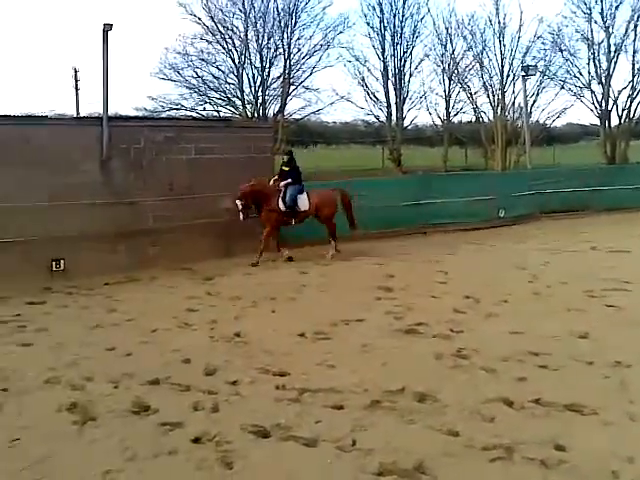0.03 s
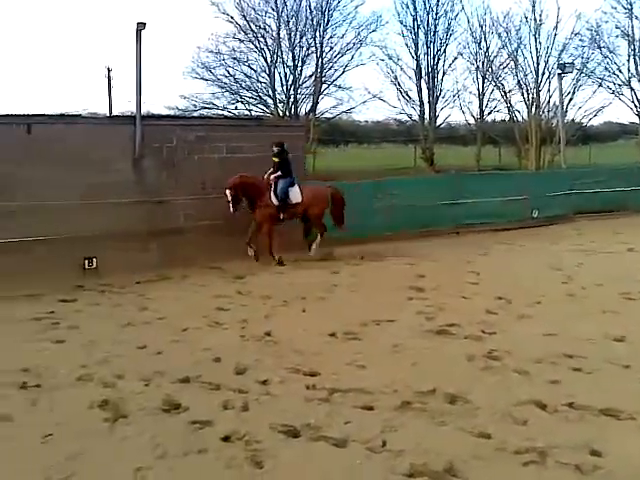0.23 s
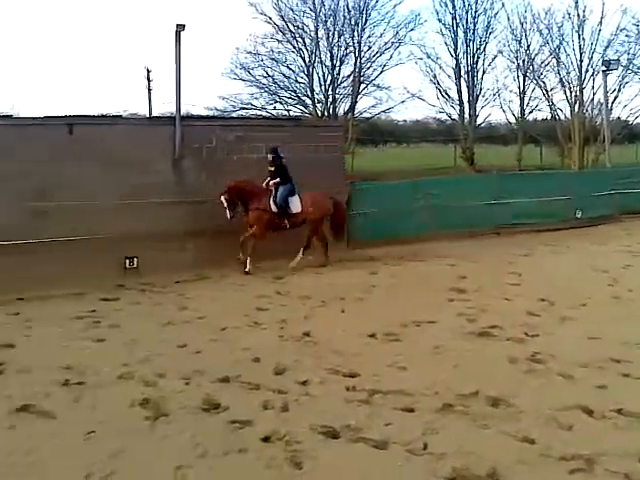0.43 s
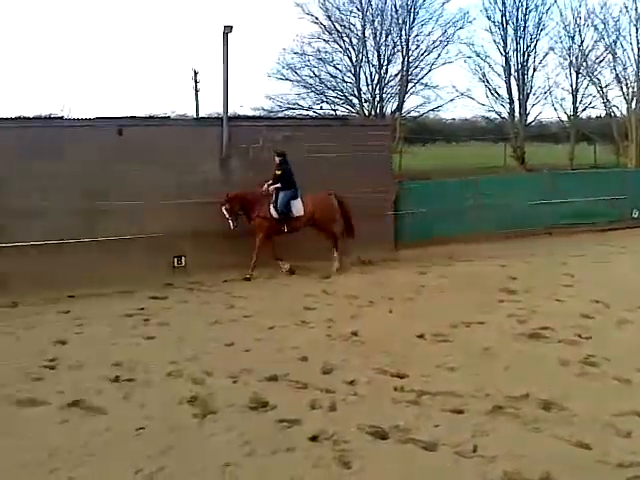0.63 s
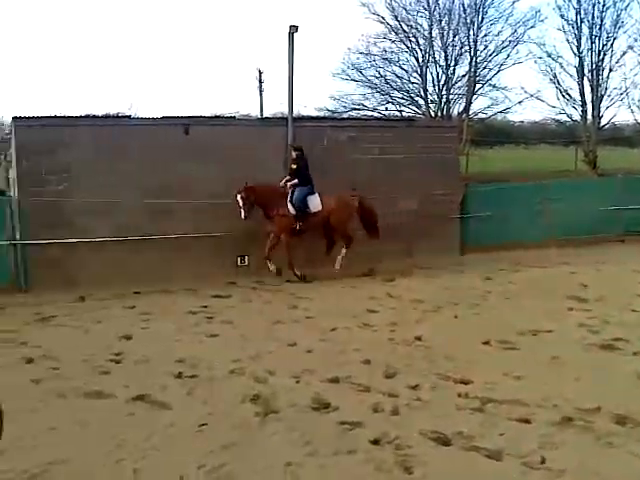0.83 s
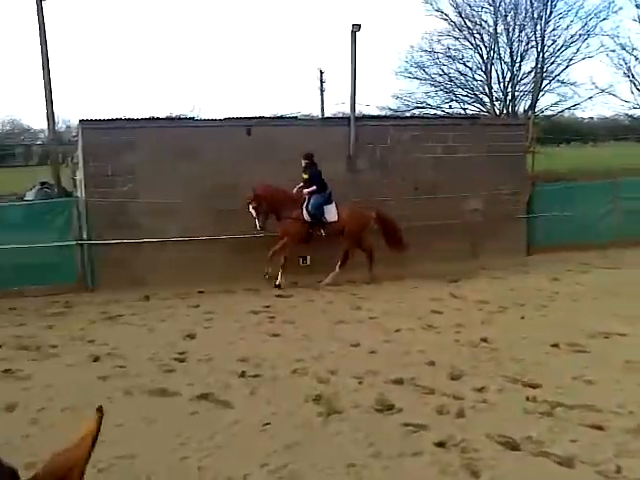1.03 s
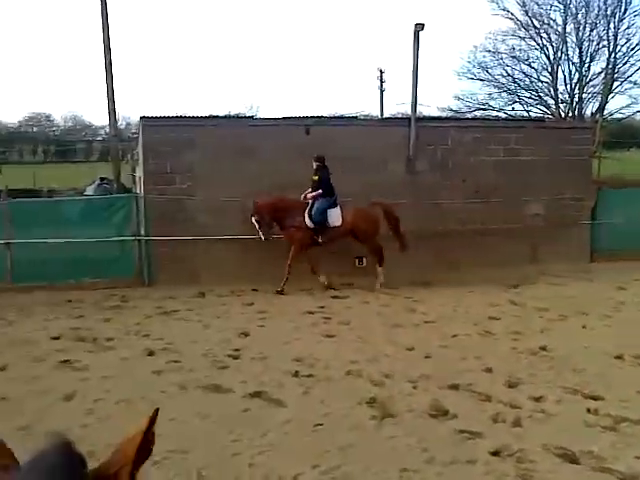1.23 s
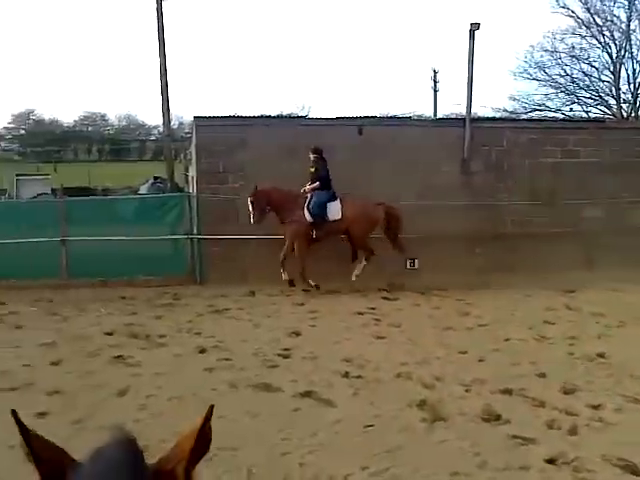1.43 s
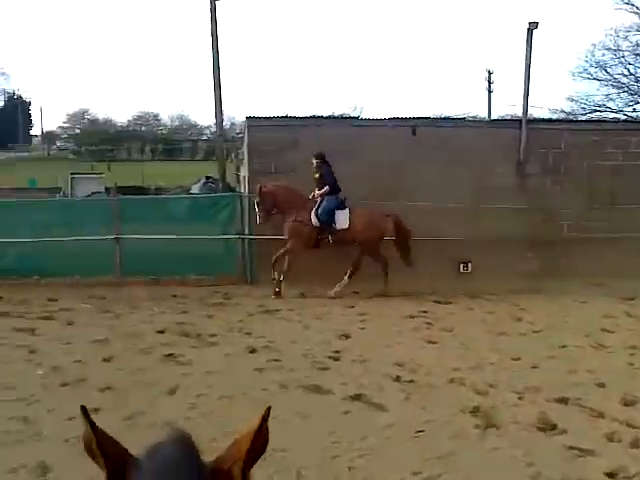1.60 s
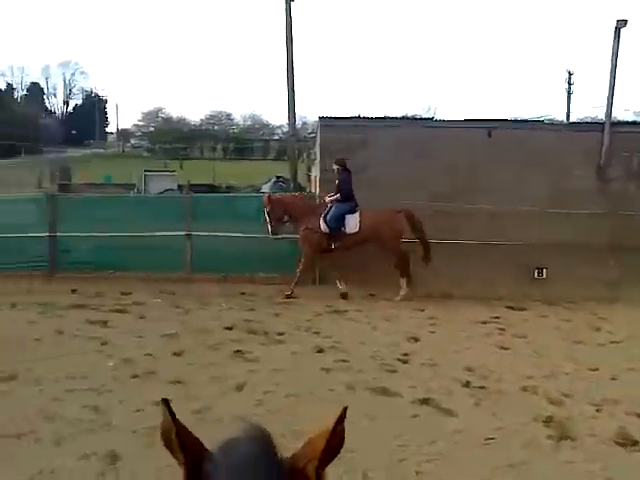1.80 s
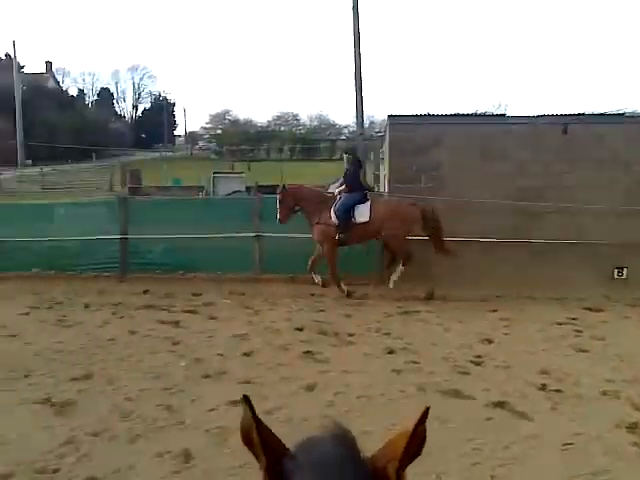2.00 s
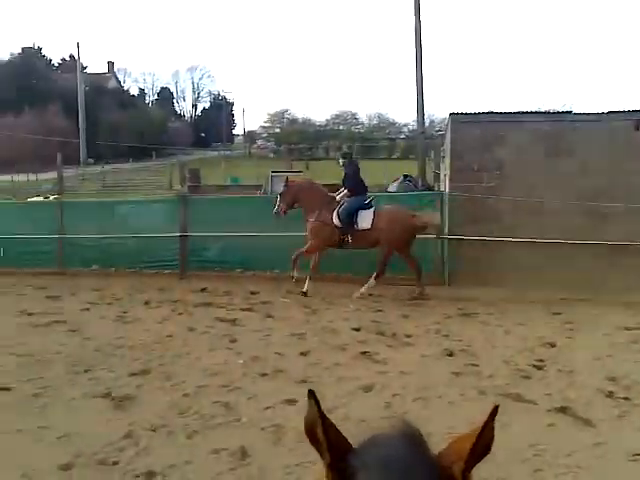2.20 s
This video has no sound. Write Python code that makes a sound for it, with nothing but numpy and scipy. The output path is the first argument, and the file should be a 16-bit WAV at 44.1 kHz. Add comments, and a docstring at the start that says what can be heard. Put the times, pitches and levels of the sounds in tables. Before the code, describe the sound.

Low, gusty wind buffets the microphone, with faint birds and hooves in sand behind.

```python
"""Dull thuds and rumble of wind, buffeting the two microphone ports separately in an outdoor sand arena.
Stronger wind is louder and brighter; single strong eddies thud.
Behind it hooves throw up short crunches of sand, bursts of tiny grit clicks.
Songbirds whistle and trill, with one faint low hoot, over a soft distant hiss."""
import sys
import numpy as np
from scipy import signal
from scipy.io import wavfile
from scipy.ndimage import uniform_filter1d

SR = 44100
rng = np.random.default_rng(int(sys.argv[2]) if len(sys.argv) > 2 else 0)


def wrap_up_sound(samples):
    """Save the sound to the file named by the first command line argument, as 16-bit audio."""
    columns = np.atleast_2d(samples).T
    # keep every value between -1 and 1, then stretch to whole-number steps
    tamed = np.clip(columns, -1, 1)
    steps = np.round(tamed * 32767).astype(np.int16)
    wavfile.write(sys.argv[1], SR, steps)


N = 99313
RIGHT_DELAY_S = .0001


def amp(db):
    return 10 ** (np.asarray(db) / 20)


def unit_rms(x):
    return x / np.sqrt(np.mean(x ** 2) + 1e-20)


def spectrum_gain(table, hz):
    table_hz, db = np.transpose(table)
    return amp(np.interp(np.log(hz + 1), np.log(table_hz + 1), db))


def wander(n, span):
    """Smooth random drift at unit RMS; span in samples."""
    return unit_rms(uniform_filter1d(uniform_filter1d(rng.standard_normal(n), span), span))


def noise_spectra(size):
    """Random short-time spectra with their times and frequencies."""
    frames = N * 4 // size + 5
    real, imag = rng.standard_normal((frames, size // 2 + 1, 2)).T
    return real + 1j * imag, np.arange(frames) * size / 4 / SR, np.fft.rfftfreq(size, 1 / SR)[:, None]


def place(mix, start_s, sound, pan_db):
    """Adds a sound, left port first; gain is 1.5 x pan_db left, 0.5 x pan_db right."""
    for channel in (0, 1):
        part = mix[channel, round((start_s + channel * RIGHT_DELAY_S) * SR):][:len(sound)]
        part += amp(pan_db * (1.5 - channel)) * sound[:len(part)]


# Hiss spectrum: (frequency [Hz], relative level [dB])
HISS_SPECTRUM = [(150, -36), (400, -5), (700, -4.5), (1100, -5), (1500, -8), (2200, -5), (4000, -5.5),
                 (6900, -8), (7400, -23), (7900, -70)]
# Treble envelope: (time [s], relative level [dB])
HISS_TREBLE = [(0, -57), (.19, -55.5), (.25, -81), (.34, -57.5), (.39, -104.5), (.44, -56), (.67, -58.5),
               (.705, -77), (.74, -60.5), (1.6, -57.5), (1.64, -77.5), (1.7, -63.5), (1.87, -63),
               (1.915, -81), (1.95, -54), (2.08, -69), (2.17, -56.5)]


def distant_hiss():
    """Soft stereo hiss in drifting patches; the treble dips briefly and is stronger on the left."""
    base_db, treble_ref_db, treble_hz, coherence = -46, -45.5, 1650, .19
    left, t, hz = noise_spectra(512)
    independent = noise_spectra(512)[0]
    delayed = left * np.exp(-2j * np.pi * hz * RIGHT_DELAY_S)
    right = coherence * delayed + np.sqrt(1 - coherence ** 2) * independent
    patches = rng.standard_normal(left.shape[::-1]).T
    patches = unit_rms(uniform_filter1d(uniform_filter1d(patches, 8, axis=0), 12, axis=1))
    patch_db = .55 * patches * (5.5 + hz / treble_hz)
    treble_db = np.interp(t, *np.transpose(HISS_TREBLE)) - treble_ref_db
    shelf_db = treble_db / (1 + (treble_hz / (hz + 1)) ** 6)
    shape = spectrum_gain(HISS_SPECTRUM, hz)
    gain = shape / np.linalg.norm(shape) * amp(base_db + shelf_db + patch_db)
    tilt = amp(1.5 * hz / treble_hz)  # the right port is shaded from the treble
    spectra = np.array([left * tilt, right / tilt]) * gain
    return signal.istft(spectra, nperseg=512, noverlap=384)[1][:, :N]


# Bird notes: (time [s], length [s], start [Hz], middle [Hz], end [Hz], base level [dB], pan [dB])
BIRD_NOTES = [(.418, .085, 3350, 2850, 3450, -54, -6), (.418, .09, 4150, 4400, 4400, -54, -8),
              (0.898, 0.135, 2700, 2540, 2190, -55.5, -8), (1.22, .009, 4100, 5000, 5700, -57, -20),
              (1.227, .041, 5700, 5050, 4250, -53, -20), (1.385, 0.065, 2450, 2030, 1900, -56, -6),
              (1.528, 0.023, 4220, 4600, 5100, -55, -8), (1.69, 0.017, 3900, 4450, 4950, -59, 8),
              (1.83, 0.036, 4950, 4700, 4550, -55.5, -12), (2.077, 0.08, 3750, 3150, 3800, -55.5, -7),
              (2.062, .075, 4200, 4200, 4350, -56.5, -10)]
# Faint low whistle: columns as BIRD_NOTES
LOW_HOOTS = [(1.2, 0.287, 441, 487.5, 496, -54, 0.0075)]


def bird_whistle(length_s, start_hz, middle_hz, end_hz, db):
    """A pure tone gliding along a parabola, slightly unsteady in pitch and level."""
    waver_ratio, flutter_db = .013, 2.5
    progress = np.arange(0, length_s, 1 / SR) / length_s
    glide_hz = np.polyval(np.polyfit([0, .5, 1], [start_hz, middle_hz, end_hz], 2), progress)
    waver = unit_rms(uniform_filter1d(rng.standard_normal(len(progress)), size=90))
    hz = glide_hz * (1 + waver_ratio * waver)
    flutter = wander(len(progress), span=200)
    envelope = amp(db + flutter_db * flutter) * np.sqrt(np.sin(np.pi * progress))
    return envelope * np.sin(2 * np.pi * np.cumsum(hz) / SR)


def bird_trill(length_s=.205, flicks_per_s=56.5, low_hz=2100, rise_hz=430, db=-54):
    """Quick upward flicks of a whistle, one after another."""
    t = np.arange(0, length_s, 1 / SR)
    progress = t * flicks_per_s % 1
    hz = low_hz + rise_hz * np.sin(np.pi * .6 * progress)
    envelope = amp(db) * np.sin(np.pi * progress) * np.minimum(t / .012, 1)
    return envelope * np.sin(2 * np.pi * np.cumsum(hz) / SR)


# Hooves in sand: (time [s], base level [dB], centre [Hz], hold [s], pan [dB])
HOOF_CRUNCHES = [(0.8515, -51, 5600, 0.008, 9), (1.3745, -45, 2700, 0.014, 5),
                 (1.452, -45, 6000, 0.0022, 10), (1.4572, -45, 6000, 0.003, 10),
                 (1.506, -46, 3000, .015, 5), (2.027, -54, 5940, 0.012, 8), (1.153, -66, 5500, 0.014, 8),
                 (1.73, -67, 5500, 0.012, 8)]


def sand_crunch(db, centre_hz, hold_s):
    """Sand thrown by a hoof: random grit clicks in a broad band, held briefly, then dying away."""
    clicks_per_s, spread_db = 3900, 3.5
    t = np.arange(0, hold_s * 4, 1 / SR)
    chance, size, polarity = rng.random((len(t), 3)).T
    clicks = (chance < clicks_per_s / SR) * np.sign(polarity - .5)
    grit = clicks * amp(-spread_db * np.log(size + .01))
    band = np.hstack(signal.iirpeak(centre_hz, Q=1.2, fs=SR))
    crunch = unit_rms(signal.sosfilt(np.tile(band, (3, 1)), grit))
    attack = np.minimum(t * 600, 1)
    decay = np.exp(-np.maximum(t / hold_s - 1, 0) / .45)
    return amp(db) * crunch * attack * decay


# Turbulence spectrum at unit speed: (frequency [Hz], relative level [dB])
EDDY_SPECTRUM = [(10, -38.5), (25, 4), (50, 5), (90, -3), (180, -8.5), (300, -17.5), (450, -28), (700, -40),
                 (1200, -73.5)]
# Wind strength per port: (time [s], level [dB])
GUSTS_LEFT = [(0, -36), (.26, -30), (.42, -29.5), (.64, -35), (.79, -26), (.92, -34.5), (1.25, -29),
              (1.49, -30), (1.68, -28.5), (1.76, -29), (1.92, -21.5), (2.02, -26.5), (2.15, -21)]
GUSTS_RIGHT = [(0, -21.5), (.08, -27), (.2, -23), (.3, -26), (.4, -18.5), (.58, -22), (.66, -29),
               (.78, -26), (.83, -32), (1.38, -33.5), (1.5, -25), (1.63, -22), (1.88, -26), (2.06, -25.5),
               (2.14, -36.5), (2.2, -21.5)]


def wind_rumble(gusts, speed_ratio):
    """Lumpy turbulence at one port: faster air is louder and brighter."""
    full_gust_db, db_per_octave, lump_db, lump_s = -27, 26, 2, .015
    gust_s, gust_db = np.transpose(gusts)
    spectra, frame_s, hz = noise_spectra(2048)
    speed = speed_ratio * 2 ** ((np.interp(frame_s, gust_s, gust_db) - full_gust_db) / db_per_octave)
    shape = spectrum_gain(EDDY_SPECTRUM, hz / speed)
    spectra = spectra * shape / np.linalg.norm(shape, axis=0)
    rumble = signal.istft(spectra, nperseg=2048, noverlap=1536)[1][:N]
    lumps = amp(lump_db * wander(N, span=round(lump_s * SR)))
    return unit_rms(rumble * lumps) * amp(np.interp(np.arange(N) / SR, gust_s, gust_db))


# Single strong eddies per port: (time [s], level [dB], pitch [Hz])
THUDS_LEFT = [(1.484, -13.5, 51), (1.589, -14, 69.5), (1.671, -18.5, 55.3), (1.839, -15, 80),
              (1.927, -9, 71), (2.093, -11.5, 97)]
THUDS_RIGHT = [(0.13, -16, 216), (0.157, -18, 101), (0.219, -16, 254), (0.268, -9.5, 55.4),
               (.342, -17.5, 230), (0.354, -10.5, 67.6), (0.397, -1, 77), (0.704, -9, 76.3),
               (1.637, -11.5, 77.3), (1.71, -24.5, 200), (1.776, -24, 130), (1.841, -13, 112.6),
               (1.911, -19, 170), (1.954, -8.5, 109)]


def wind_buffeting(rumble, thuds):
    """Rumble plus thuds: each strong eddy is a short pressure pulse, and fine turbulence flares round it."""
    flare_db, flare_s, width_cycles = 9, .014, .29
    t = np.arange(N) / SR
    fine = signal.lfilter(*signal.butter(1, 200, "high", fs=SR), rumble)
    flare = np.minimum(sum(np.exp(-((t - time_s) / flare_s) ** 2) for time_s, _, _ in thuds), 1)
    wind = rumble + fine * (amp(flare_db * flare) - 1)
    wind = signal.sosfilt(signal.butter(4, 1500, fs=SR, output="sos"), wind)
    for time_s, db, hz in thuds:
        cycles = (t - time_s) * hz
        envelope = amp(db) * np.exp(-(cycles / width_cycles) ** 2)
        wind += envelope * np.sin(2 * np.pi * (cycles + rng.random()))
    return wind


def scene():
    mix = distant_hiss()
    mix[0] += wind_buffeting(wind_rumble(GUSTS_LEFT, speed_ratio=.61), THUDS_LEFT)  # sheltered port
    mix[1] += wind_buffeting(wind_rumble(GUSTS_RIGHT, speed_ratio=.98), THUDS_RIGHT)
    for time_s, db, centre_hz, hold_s, pan_db in HOOF_CRUNCHES:
        place(mix, time_s, sand_crunch(db, centre_hz, hold_s), pan_db)
    for time_s, *note, pan_db in BIRD_NOTES + LOW_HOOTS:
        place(mix, time_s, bird_whistle(*note), pan_db)
    place(mix, 1.178, bird_trill(), pan_db=-1.5)
    return mix


def record(dry):
    """Microphone: dull above a knee, band-limited, with a small DC offset on the right."""
    knee_hz, limit_hz, shelf_gain, right_offset = 6670, 15100, amp(-5.5), .0135
    hz = [0, knee_hz - 300, knee_hz + 300, limit_hz - 200, limit_hz, SR / 2]
    taps = signal.firwin2(511, hz, [1, 1, shelf_gain, shelf_gain / 2, 0, 0], fs=SR)
    return signal.oaconvolve(dry, taps[None], "same") + [[0], [right_offset]]


dry = scene()
out = record(dry)
wrap_up_sound(out)
```